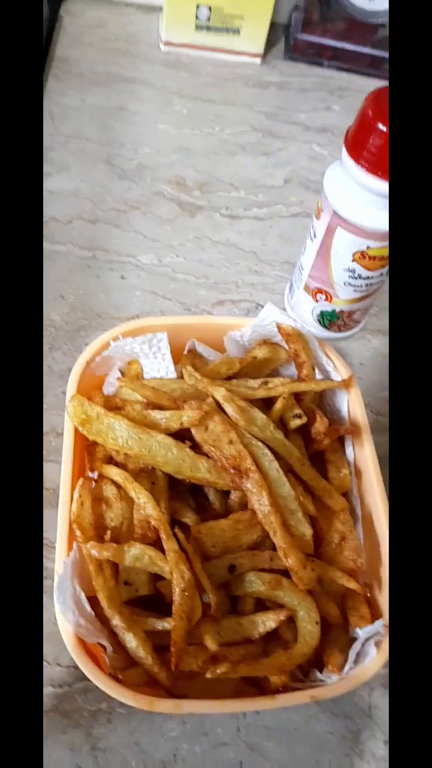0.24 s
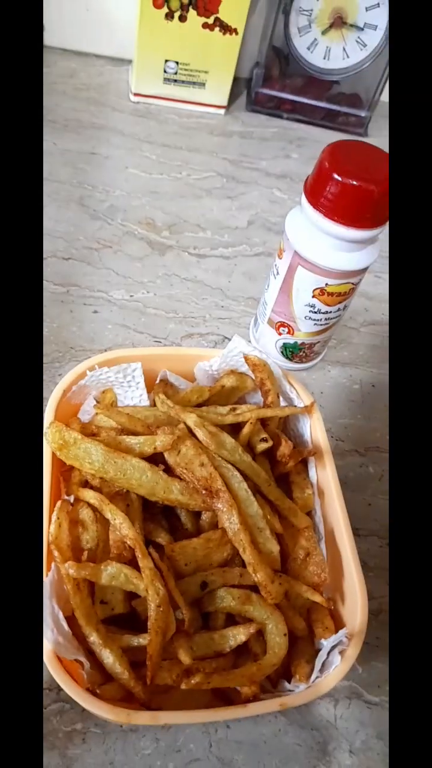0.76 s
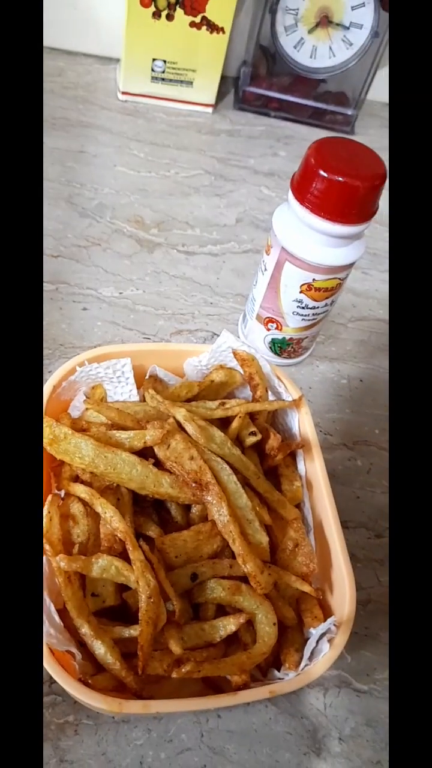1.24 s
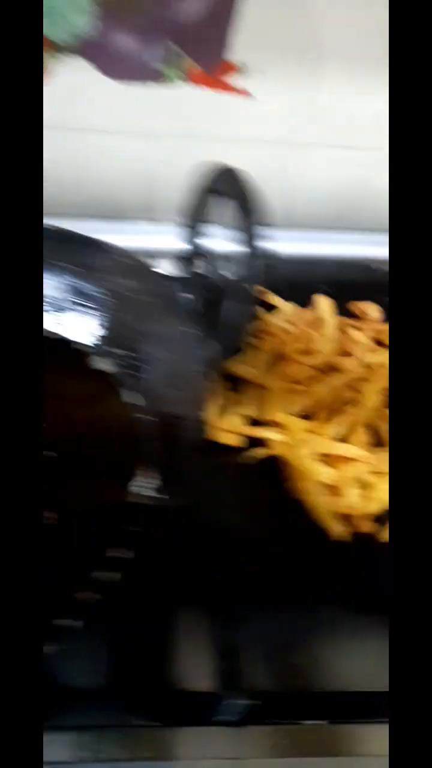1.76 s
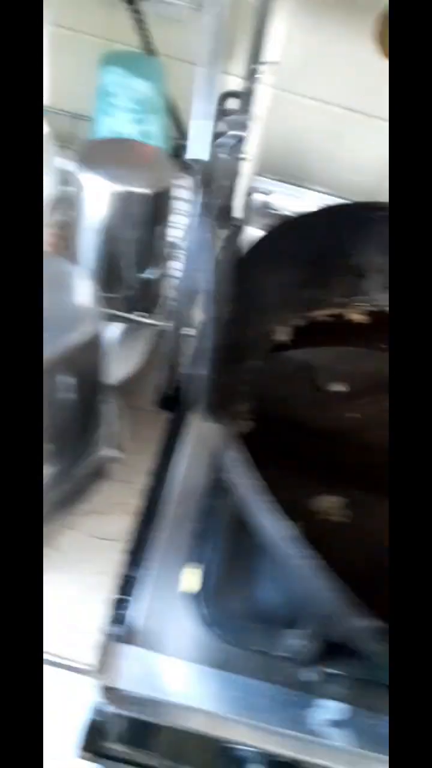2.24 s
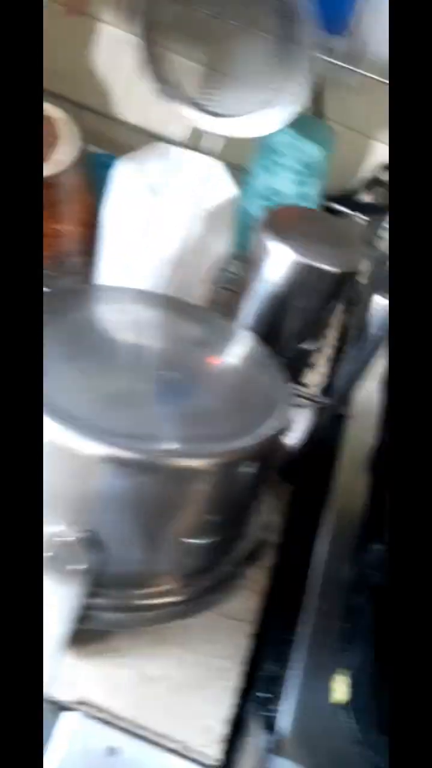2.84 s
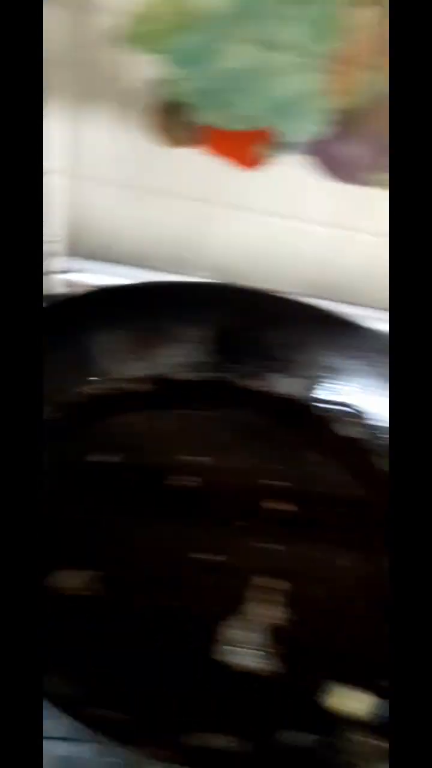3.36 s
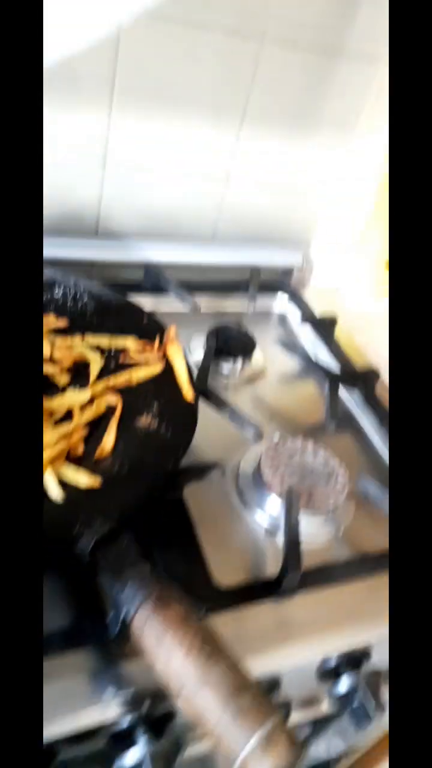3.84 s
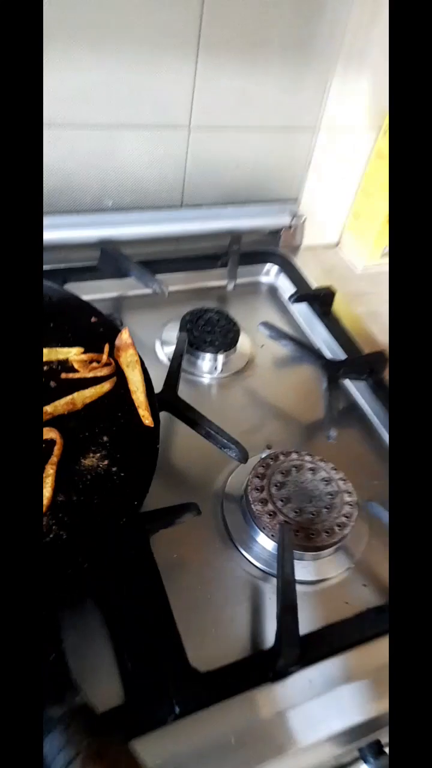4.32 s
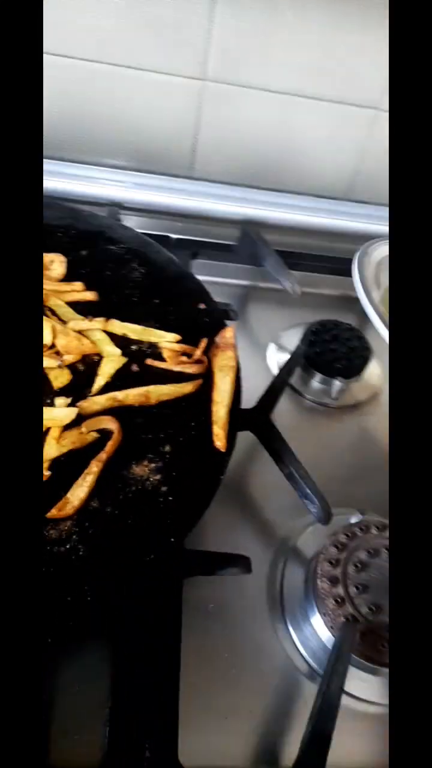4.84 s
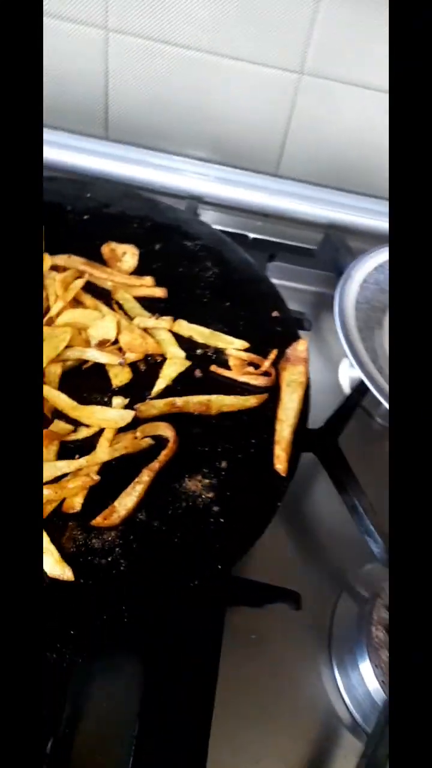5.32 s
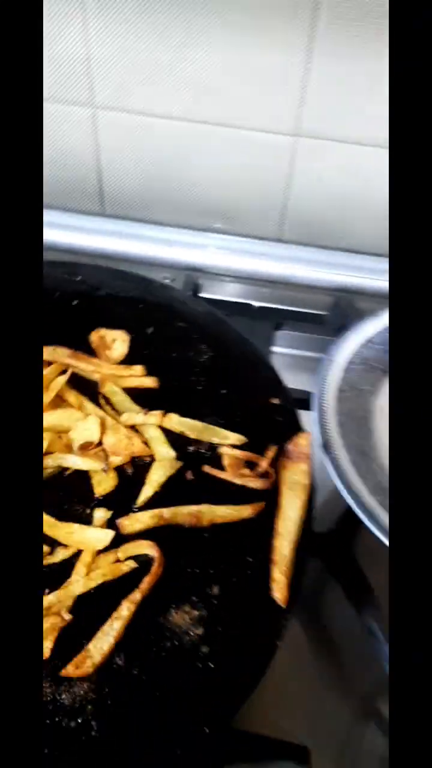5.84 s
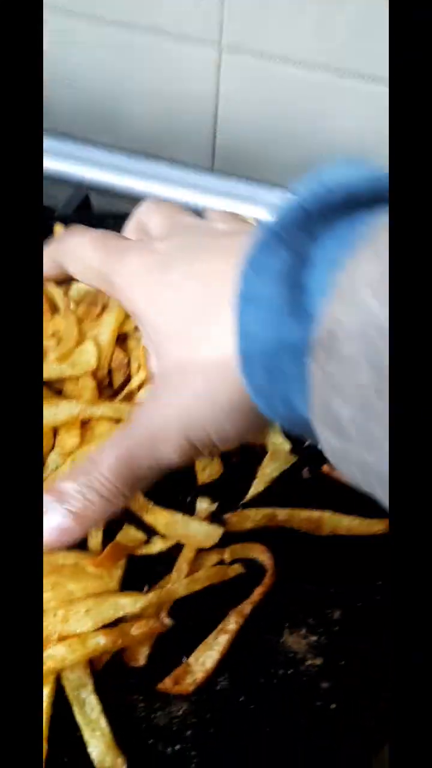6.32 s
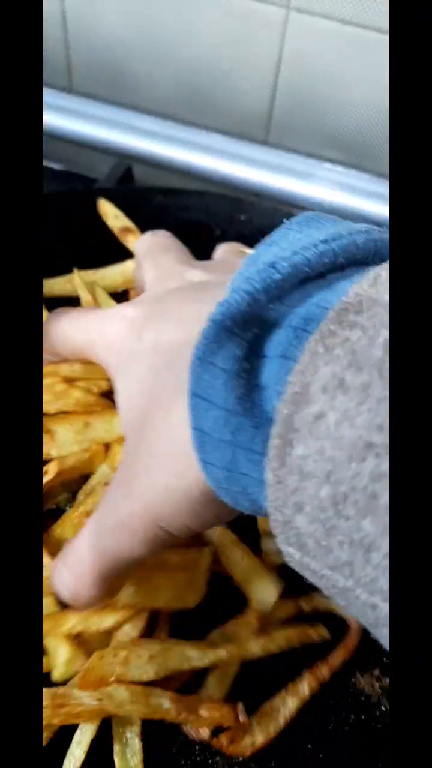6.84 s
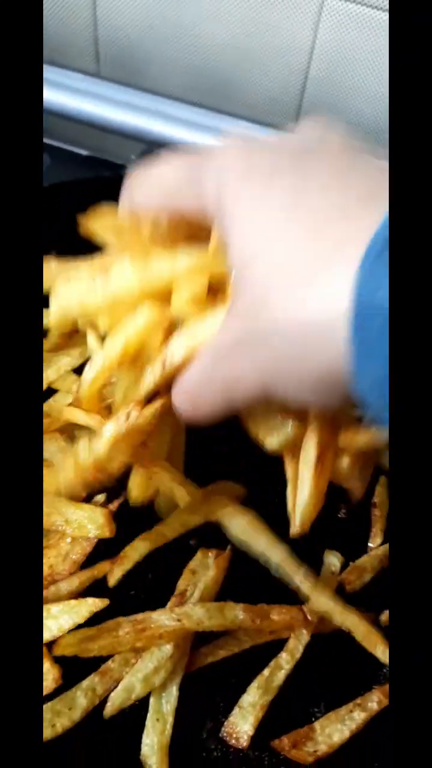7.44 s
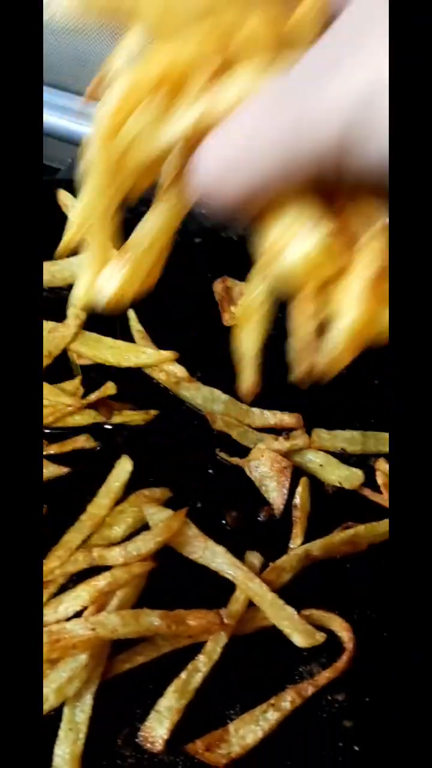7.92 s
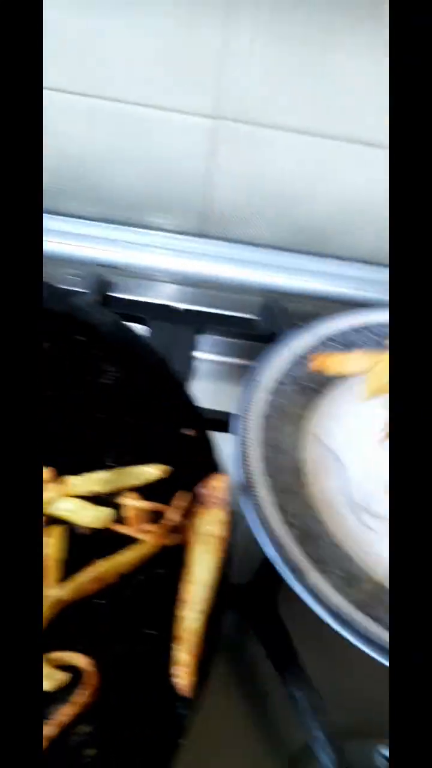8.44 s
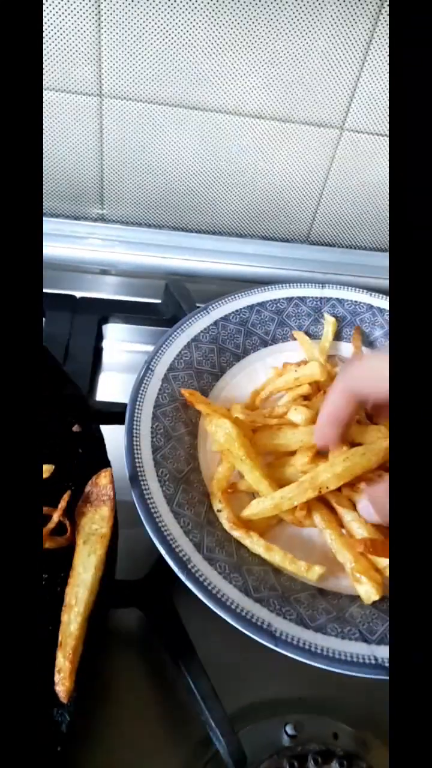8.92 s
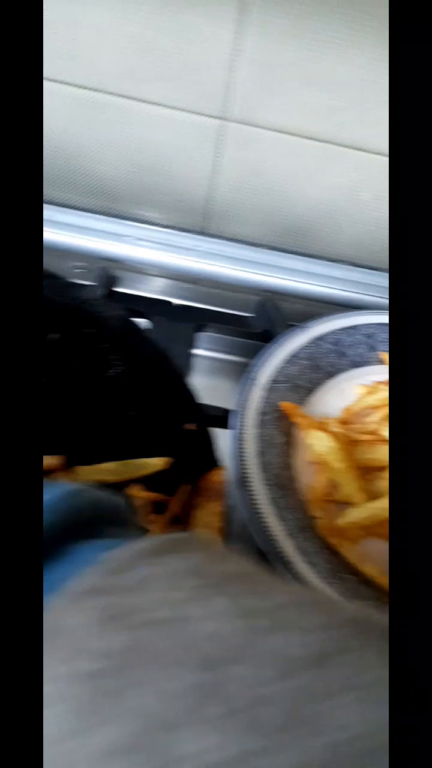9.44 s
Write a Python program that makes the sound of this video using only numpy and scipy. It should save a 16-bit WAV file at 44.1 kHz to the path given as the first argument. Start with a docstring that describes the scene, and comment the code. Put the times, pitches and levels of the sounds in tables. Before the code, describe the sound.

Faint hiss and the low rumble of a hand-held microphone open the scene in a small tiled kitchen, cutting out for an instant near 1.4 seconds. A sleeve brushes past softly around 2 seconds. From 2.7 to 3 seconds a dish scrapes along a steel lid with quick clanks, ending in a ringing knock against a pot. Soft bumps and finger rubs follow. At 5.3 and 5.6 seconds a plate lands on the stove grate in two loud, booming knocks, rocking briefly, with a short echo. From about 6.8 to 7.8 seconds a hand gathers crisp fries with a quiet, close crackle, and a few tick back into the pan until 8 seconds. Between 8.5 and 8.9 seconds the handful patters onto the plate. A last faint sleeve brush comes near 9.7 seconds.

```python
"""A plate lands on a stove grate in two booming knocks as fried potatoes are served in a small tiled kitchen.
Before that, a dish is dragged out from among steel ware, which scrapes, clanks and rings.
Afterwards a hand gathers the crackling fries; a few tick back into the pan, the rest drop on the plate.
Each knock is a snap, a clatter and ringing modes; scrape and crackle are noise broken into tiny grains.
Underneath, the hand-held microphone rumbles, a sleeve brushes past and a faint hiss runs on."""
import sys
import numpy as np
from scipy import signal
from scipy.fft import rfft, irfft, next_fast_len
from scipy.io import wavfile

SR = 44100
rng = np.random.default_rng(int(sys.argv[2]) if len(sys.argv) > 2 else 0)


def generate_wav(sig):
    """Save sig (samples, or channels by samples) to the path in sys.argv[1] as 16-bit PCM at SR."""
    pcm = np.round(np.clip(np.atleast_2d(sig).T, -1, 1) * 32767).astype(np.int16)
    wavfile.write(sys.argv[1], SR, pcm)


N = 426447
DROPOUT_START_S, DROPOUT_END_S = 1.378, 1.487


def from_db(db):
    """Decibels to amplitude."""
    return 10 ** (np.asarray(db) / 20)


def rms(x):
    """Average strength of a signal."""
    return np.sqrt(np.mean(x ** 2) + 1e-20)


def at_hz(points, hz):
    """Read a curve on a log-frequency axis."""
    f, value = np.transpose(points)
    return np.interp(np.log(hz + 1e-9), np.log(f), value)


def panned(x, pan_db):
    """Lean the sound to the left by pan_db."""
    return x * from_db([[pan_db / 2], [-pan_db / 2]])


# Stereo image, how alike left and right are: (frequency [Hz], correlation [0-1])
STEREO_LIKENESS = [(100, .97), (320, .92), (600, .4), (1100, .02), (2500, 0)]


def noise(colour, size=N):
    """Coloured stereo noise of rms 1, centred in the bass and wide in the treble."""
    padded = next_fast_len(size)
    hz = np.fft.rfftfreq(padded, 1 / SR)
    mid, side = rfft(rng.standard_normal((2, padded)))
    alike = at_hz(STEREO_LIKENESS, hz)
    gain = from_db(at_hz(colour, hz)) * np.minimum(hz / colour[0][0], 1) ** 2
    pair = np.sqrt(1 + alike) * mid + np.sqrt(1 - alike) * side * [[1], [-1]]
    x = irfft(gain * pair, padded)[:, :size]
    return x / rms(x)


def strokes(rows, rise_s, fall_s, sag_db_per_s=0):
    """Gestures that swell up to their cue, hold or sag, then die; rise and fall are times per 20 dB."""
    power = 0
    for start, length, db in rows:
        t = np.arange(N) / SR - start
        fade = np.maximum(-t, 0) / rise_s + np.maximum(t - length, 0) / fall_s
        sag_db = sag_db_per_s * np.clip(t, 0, length)
        power += from_db(db - sag_db - 20 * np.minimum(fade, 10)) ** 2
    return np.sqrt(power)


def grains(per_s, size_db, grain_s):
    """Envelope of many tiny slips or snaps of uneven size, each dying quickly; rms 1."""
    born = rng.random(N) < per_s / SR
    energy = born * from_db(size_db * np.minimum(rng.exponential(1, N), 4)) ** 2
    envelope = np.sqrt(signal.lfilter([1], [1, -np.exp(-2 / (grain_s * SR))], energy + 1e-18))
    return envelope / rms(envelope)


def ringing(modes, t, spread_db=2, waver=0.52, waver_hz=50):
    """Decaying sines that waver with loose contact; high ones reach left and right out of step."""
    hz, db, t60 = np.transpose(modes)[:, :, None]
    strength = from_db(db + spread_db * rng.standard_normal(hz.shape) - 60 * t / t60)
    apart = np.arccos(at_hz(STEREO_LIKENESS, hz)) * rng.choice([-1, 1], hz.shape)
    knots = rng.standard_normal((len(hz), 2, 128))
    drift = [[np.interp(t * waver_hz, np.arange(len(k)), k) for k in pair] for pair in knots]
    swell, lag = np.transpose(drift, (1, 0, 2))
    envelope = strength * (1 + waver * swell)
    phase = 2 * np.pi * (hz * t + rng.random(hz.shape)) + waver * lag
    return np.array([(envelope * np.sin(phase + side * apart / 2)).sum(0) for side in (1, -1)])


def excite(force, modes):
    """Steady rubbing keeps a body's modes ringing, as strong as the force."""
    x = signal.fftconvolve(force, ringing(modes, np.arange(SR // 4) / SR), axes=1)[:, :N]
    return x * rms(force) / rms(x)


def three_bands(x):
    """Split into thud, ring and crack."""
    edges_hz = [(40, 800), (800, 3200), (3200, 18000)]
    return [signal.sosfilt(signal.butter(2, e, "band", fs=SR, output="sos"), x) for e in edges_hz]


def blows(hits, colour, modes=(), *, clatter_t60, snap_db, modes_db=0, pan_db=0, snap_s=0.0049):
    """Each blow is a snap of contact, a clatter of crowded modes and, given modes, a lasting ring."""
    out, t = np.zeros((2, N + SR)), np.arange(SR // 2) / SR
    head = t < .025  # levels are set on the first 25 ms
    attack = 1 - np.exp(-t / .0005)
    for time, *band_db in hits:
        envelope = from_db(-60 * t / clatter_t60) + from_db(snap_db) * np.exp(-t / snap_s)
        x = noise(colour, len(t)) * envelope
        if modes:
            ring = ringing(modes, t)
            x = x / rms(x[:, head]) + from_db(modes_db) * ring / rms(ring[:, head])
        start = round(time * SR)
        # the hardness of the contact shares the force between low and high
        for sign, db, band in zip((1, -1, 1), band_db, three_bands(x * attack)):
            out[:, start:start + len(t)] += sign * from_db(db) * band / rms(band[:, head])
    return panned(out[:, :N], pan_db)


# Tone of the hiss bed: (frequency [Hz], level [dB])
HISS_EQ = [(300, -2.5), (500, -12), (900, -17), (1700, -21), (4000, -24.5), (5200, -18), (8000, -30),
           (13000, -24.5), (16000, -26.5)]


def hiss():
    """A faint bed of air that steps up after the dropout."""
    level_db = np.where(np.arange(N) / SR < DROPOUT_END_S, -75, -66.5)
    return from_db(level_db) * noise(HISS_EQ)


# Cues for a thin whine and a brief hum: (time [s], length [s], level [dB])
WHINE_CUES = [(0, 1.38, -83), (4.75, 0.78, -82)]
HUM_CUES = [(3.9, 0.14, -63.5)]


def faint_tones(whine_hz=1998, hum_hz=405, fade_s=.16):
    """Two faint sines that fade in and out."""
    t = np.arange(N) / SR
    return sum(strokes(cues, fade_s, fade_s) * np.sqrt(2) * np.sin(2 * np.pi * hz * t)
               for cues, hz in ((WHINE_CUES, whine_hz), (HUM_CUES, hum_hz)))


# Microphone moves: (time [s], length [s], relative level [dB])
MOVE_CUES = [(1.8, 1.86, -53.5), (4.45, 0.35, -54.5), (5.1, 1.35, -56), (7.0, 0.97, -51.5),
             (8.45, 1.08, -54)]
# Low weight of the rumble: (frequency [Hz], level [dB])
RUMBLE_EQ = [(25, -39.5), (45, -11), (65, 5), (110, 4), (180, -8.5), (260, -15.5), (320, -7), (420, -22.5),
             (800, -30), (1500, -45)]


def handling_rumble():
    """A low floor of rumble that swells as the microphone is carried about."""
    held_still = from_db(-60)
    moving = strokes(MOVE_CUES, rise_s=0.41, fall_s=0.17)
    return from_db(-1.48) * np.hypot(held_still, moving) * noise(RUMBLE_EQ)


# Casing ticks: (time [s], thud [dB], ring [dB], crack [dB])
TICK_HITS = [(0.219, -72, -81, -68.5), (4.137, -78, -65.5, -81)]
# Tone of a tick: (frequency [Hz], level [dB])
TICK_EQ = [(300, 0), (1500, -6), (4000, -6), (9000, -7), (15000, 0)]


def casing():
    """The hand-held casing gives small dry ticks, right at the microphone."""
    return blows(TICK_HITS, TICK_EQ, clatter_t60=0.022, snap_db=-6, pan_db=-0.5, snap_s=.001)


# Sleeve passes: (time [s], length [s], relative level [dB], rise [s])
SLEEVE_CUES = [(1.62, 0.29, -58, 0.27), (2.32, 0.16, -49.5, 0.59), (3.72, 0.051, -61.5, .2),
               (4.032, 0.04, -55, .004), (4.52, 0.033, -52.5, 0.032), (9.655, 0.023, -57.5, 0.015)]
# Finger rubs: (time [s], length [s], level [dB])
FINGER_CUES = [(4.04, 0.071, -72.5), (4.52, 0.12, -53), (9.3, 0.32, -75)]
# Soft bumps: (time [s], thud [dB], ring [dB], crack [dB])
BUMP_HITS = [(3.414, -60, -91, -74), (4.031, -67, -85, -76), (6.13, -53, -74, -78),
             (6.228, -58.5, -58.5, -79), (6.935, -51.5, -62, -67), (7.028, -49, -56.5, -72)]
# Airy cloth, muffled fingers, dull bumps: (frequency [Hz], level [dB])
SLEEVE_EQ = [(240, -34.5), (400, -3.5), (439, -1.5), (1140, -5.5), (1530, -4), (6150, -8.5), (8110, -14.5),
             (12500, -9.5), (15000, -12.5), (16000, -17)]
FINGER_EQ = [(180, -13), (330, 6), (500, -11.5), (900, -15), (2000, -30.5), (6000, -47.5)]
BUMP_EQ = [(59, -47), (100, 18.5), (202, -10), (339, 4), (2050, -28.5), (2520, -36.5), (6930, -57.5),
           (8180, -49), (14000, -82)]


def hand():
    """The sleeve brushes past, fingers rub on the casing and the hand bumps softly on things."""
    brush_power = sum(strokes([cue], rise_s, fall_s=0.3) ** 2 for *cue, rise_s in SLEEVE_CUES)
    sleeve = panned(np.sqrt(brush_power) * noise(SLEEVE_EQ), pan_db=-0.3)
    fingers = strokes(FINGER_CUES, rise_s=0.54, fall_s=0.23) * noise(FINGER_EQ)
    bumps = blows(BUMP_HITS, BUMP_EQ, clatter_t60=0.63, snap_db=-2, pan_db=-3.5)
    return from_db(-1.73) * sleeve + fingers + from_db(1) * bumps


# Fries landing in the pan and on the plate: (time [s], thud [dB], ring [dB], crack [dB])
PAN_DROPS = [(7.452, -56, -56, -52), (7.592, -67, -46.5, -49), (7.645, -67, -59, -51),
             (7.7505, -45, -42, -42), (7.9295, -58, -51, -38.5)]
PLATE_DROPS = [(8.483, -56, -58, -58.5), (8.523, -49, -52.5, -42.5), (8.566, -55, -46, -58),
               (8.609, -40, -47.5, -54), (8.621, -40, -34, -54), (8.643, -38.5, -40, -21.5),
               (8.6625, -32, -34, -55.5), (8.741, -47.5, -43, -35), (8.769, -40, -47, -44.5),
               (8.791, -43, -42, -43), (8.885, -78, -57, -54), (8.91, -75, -68, -59)]
# Clatter of pan and plate: (frequency [Hz], level [dB])
PAN_EQ = [(400, -38), (900, -27), (1200, -2), (2800, -13.5), (6500, -7.5), (8000, -15), (12500, -9),
          (16000, -21)]
PLATE_EQ = [(60, 12), (320, 0.5), (600, -7.5), (1170, -8), (1500, -11.5), (2000, -7), (5000, -10),
            (8500, -17.5), (14000, -14)]
# Their resonances: (frequency [Hz], level [dB], t60 [s])
PAN_RING = [(61.5, 4, 1), (1117, 1.5, 0.17), (1250, -26, 0.16), (1502, 4.5, 0.18), (2620, -7, 0.29),
            (3120, -4, 0.16), (4226, 2, 0.11), (4630, 10, 0.041), (6520, -22, 0.23), (6640, 6.5, 0.1),
            (9800, -6, 0.11), (12300, -31, 0.08)]
PLATE_RING = [(89.3, -3.5, 0.63), (199.7, -6.5, 0.43), (324.4, 2.5, 0.32), (1150, 2, 0.071),
              (1954, -3, 0.22), (2020, 0.5, 0.1), (2990, 7.5, 0.04), (3740, 1.5, 0.072), (4860, 6.5, 0.047),
              (4910, 1.5, 0.05), (6770, -2.5, 0.051), (7500, 1.5, 0.047), (12500, -6, 0.09)]


def falling_fries():
    """Strays tick back into the pan, then the handful patters on the plate."""
    pan = blows(PAN_DROPS, PAN_EQ, PAN_RING, clatter_t60=0.17, snap_db=5, modes_db=-0.5, pan_db=-3.5)
    plate = blows(PLATE_DROPS, PLATE_EQ, PLATE_RING,
                  clatter_t60=0.18, snap_db=1, modes_db=1.5, pan_db=-1)
    return from_db(-1.5) * (pan + plate)


# The fries are squeezed or dropped, then settle: (time [s], length [s], relative level [dB])
CRACKLE_CUES = [(6.6, 0.031, -63), (6.78, 0.044, -57), (6.88, 0.12, -43), (7.16, 0.64, -37.5),
                (8.67, .07, -41), (9.04, 0.044, -56.5)]
# Crisp tone of the crusts: (frequency [Hz], level [dB])
CRUST_EQ = [(180, -19), (300, -8.5), (584, -12.5), (801, -7.5), (1360, -8), (1460, -13.5), (1580, -7.5),
            (3030, -6), (6740, -10.5), (8220, -18), (11500, -9.5), (14200, -11), (16000, -14)]


def crackling_fries():
    """Crisp fries rub and snap against the pan, which rings faintly in all but its deepest mode."""
    rubbing = noise(CRUST_EQ) * grains(per_s=970, size_db=1, grain_s=0.0092)
    snaps = noise(CRUST_EQ) * grains(per_s=140, size_db=5, grain_s=0.0018)
    squeeze = strokes(CRACKLE_CUES, rise_s=0.19, fall_s=0.048, sag_db_per_s=31.5)
    crackle = squeeze * (rubbing + from_db(-8) * snaps)
    pan_ring = excite(crackle, PAN_RING[1:])
    return panned(from_db(-2) * crackle + from_db(-15) * pan_ring, pan_db=-2.5)


# The dish is pushed, catches at once and slides to rest: (time [s], length [s], relative level [dB])
SCRAPE_CUES = [(2.665, .11, -19.5), (2.9, .08, -27.5)]
# Clanks of lid and pot: (time [s], thud [dB], ring [dB], crack [dB])
LID_CLANKS = [(2.663, -39, -23, -32.5), (2.691, -33.5, -31.5, -28), (2.711, -26, -29, -22.5),
              (2.8, -38.5, -34.5, -30), (2.835, -34, -32.5, -23.5), (2.877, -28.5, -25, -19.5),
              (2.9165, -28, -14, -21.5), (2.935, -35.5, -21, -33)]
POT_CLANKS = [(2.989, -20.5, -19, -15.5)]
# Rasp of the scrape, clatter of lid and pot: (frequency [Hz], level [dB])
SCRAPE_EQ = [(35, -39.5), (60, -6.5), (94, -5), (217, -23.5), (308, -1.5), (389, -17.5), (553, -1),
             (862, -7.5), (1700, -7.5), (2140, 0.5), (2710, -12), (5330, -11), (9130, -19), (13600, -11),
             (16000, -20.5)]
LID_EQ = [(59, -49.5), (100, -15), (202, -27), (398, -11), (502, -23.5), (1330, -9), (3470, -19.5),
          (5080, -22.5), (16000, -26.5)]
POT_EQ = [(59, -47), (100, -9.5), (193, -29.5), (302, -10.5), (461, -6.5), (634, -8), (2930, -12.5),
          (3620, -11.5), (16000, -22.5)]
# Steel resonances: (frequency [Hz], level [dB], t60 [s])
LID_RING = [(1328, 5, 0.11), (1420, 1, 0.07), (1578, -2.5, 0.24), (2127, -6, .2), (2250, -2.5, 0.09),
            (2500, -9.5, 0.23), (2760, -7, 0.18), (4290, -8.5, 0.1), (5010, -12.5, .12), (7290, -15, .15)]
POT_RING = [(313, -10.5, .35), (563, -7, 0.25), (622, -2, .26), (1330, -7.5, 0.16), (1480, -6.5, .2),
            (1535, 1.5, 0.23), (2540, -7.5, .25), (3410, -1.5, 0.076), (3567, -1, 0.25), (3672, -5, .13),
            (4160, -14, .25), (6620, -13, 0.21), (7740, -19.5, 0.34)]


def steel_ware():
    """A dish drags along a steel lid in rough slips that keep it ringing, jolts it and knocks a pot."""
    push = strokes(SCRAPE_CUES, rise_s=.02, fall_s=.14)
    scrape = push * noise(SCRAPE_EQ) * grains(per_s=500, size_db=2.5, grain_s=0.0079)
    lid = blows(LID_CLANKS, LID_EQ, LID_RING, clatter_t60=0.22, snap_db=-4.5, modes_db=-5.5, pan_db=1)
    pot = blows(POT_CLANKS, POT_EQ, POT_RING, clatter_t60=0.34, snap_db=2, modes_db=1, pan_db=1)
    return from_db(-3) * scrape + from_db(-14.5) * excite(scrape, LID_RING) + from_db(-4) * (lid + pot)


# Two knocks with their rebounds: (time [s], thud [dB], ring [dB], crack [dB])
GRATE_KNOCKS = [(5.323, -16.5, -20, -28), (5.337, -23.5, -37, -42.5), (5.395, -24, -43, -53.5),
                (5.459, -26, -34, -51.5), (5.602, -16, -14.5, -19.5), (5.623, -15.5, -25.5, -35)]
# Clatter of plate on grate: (frequency [Hz], level [dB])
GRATE_EQ = [(65, -9), (90, -10.5), (200, -1.5), (400, -3), (700, -4), (2000, -10.5), (2750, -16),
            (3050, -8), (3400, -16.5), (4500, -17.5), (4950, -11.5), (5500, -19.5), (8000, -28.5),
            (15000, -33.5)]
# Resonances, from low boom to bright clink: (frequency [Hz], level [dB], t60 [s])
GRATE_RING = [(84, -5.5, 0.96), (193.7, -2, 0.52), (254.8, -8, 0.52), (320, 7.5, 0.29), (340, 3, 0.3),
              (448.5, -4.5, 0.73), (624.6, -12.5, 0.23), (844.7, -4.5, 0.37), (966, 1, 0.12),
              (1180, -13.5, .2), (1225, -6, 0.19), (1463, -12, .3), (1885, -7.5, 0.35), (1967, -6, 0.32),
              (2490, -9, .18), (2970, 4, 0.14), (3090, -13, 0.22), (3880, -24, 0.23), (4760, -13.5, 0.29),
              (5315, -14.5, .15), (6722, -16, 0.37)]


def plate_on_grate():
    """One edge of the plate lands and rocks, then the other; the stove top booms beneath."""
    knocks = blows(GRATE_KNOCKS, GRATE_EQ, GRATE_RING, clatter_t60=0.13, snap_db=-5.5, modes_db=-1.5)
    return from_db(-2.14) * knocks


# Reverb time of the tiled room: (frequency [Hz], t60 [s])
KITCHEN_DECAY = [(80, .7), (300, 0.68), (1000, .52), (3500, .48), (7000, 0.39), (14000, 0.44)]


def kitchen(send, build_s=0.0033):
    """Dense echoes off the tiles build up quickly and die sooner in the treble."""
    t, hz = np.arange(SR) / SR, np.fft.rfftfreq(SR, 1 / SR)
    white = rfft(noise([(20, 0), (20000, 0)], SR))
    tail = 0
    for centre, t60 in KITCHEN_DECAY:
        band = at_hz([(f, f == centre) for f, _ in KITCHEN_DECAY], hz)
        tail += irfft(white * band, SR) * from_db(-60 * t / t60)
    tail *= (1 - np.exp(-t / build_s)) ** 2
    return signal.fftconvolve(send, tail / (rms(tail) * np.sqrt(SR)), axes=1)[:, :N]


def scene():
    """Mix the layers; the steel ware stands farthest off and so sounds wettest."""
    steel, plate = steel_ware(), plate_on_grate()
    near = crackling_fries() + falling_fries() + hand()
    echoes = kitchen(from_db(-8) * steel + from_db(-9.5) * plate + from_db(-14.5) * near)
    background = handling_rumble() + hiss() + faint_tones() + casing()
    return background + echoes + near + steel + plate


# Tonal tilt between the two microphones: (frequency [Hz], left minus right [dB])
STEREO_TILT = [(120, 2.5), (200, -2.5), (310, -6.5), (520, -0.5), (1100, 0), (2500, -0.5), (14000, -2)]


def record(dry):
    """Tilt left against right, cut the deepest bass, clip peaks, drop out briefly and cut the top."""
    size, t = next_fast_len(N + SR), np.arange(N) / SR
    lean_db = at_hz(STEREO_TILT, np.fft.rfftfreq(size, 1 / SR))
    x = irfft(rfft(dry, size) * from_db([lean_db / 2, -lean_db / 2]), size)[:, :N]
    low_cut = signal.butter(4, 48, "high", fs=SR, output="sos")
    high_cut = signal.ellip(10, .1, 80, 16000, fs=SR, output="sos")
    gate = (t < DROPOUT_START_S) | (t > DROPOUT_END_S)
    x = np.clip(signal.sosfilt(low_cut, x), -1, 1) * gate
    return signal.sosfilt(high_cut, x)


dry = scene()
out = record(dry)
generate_wav(out)
```